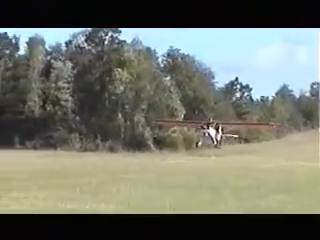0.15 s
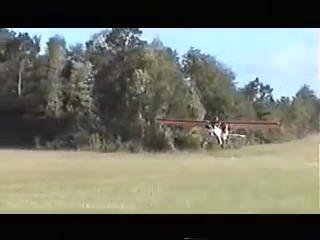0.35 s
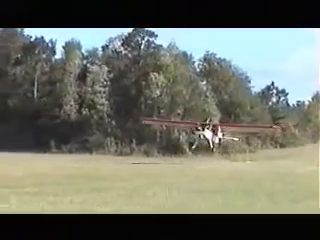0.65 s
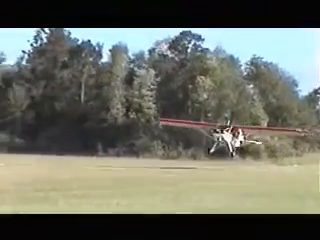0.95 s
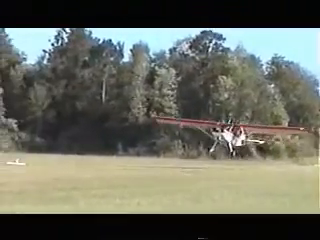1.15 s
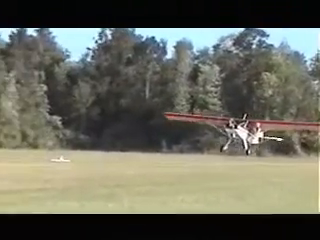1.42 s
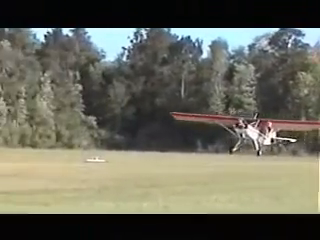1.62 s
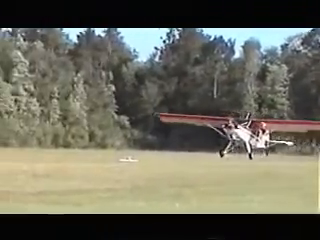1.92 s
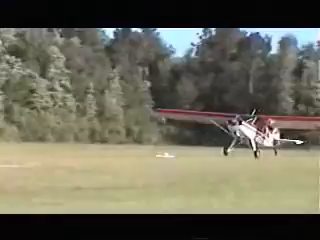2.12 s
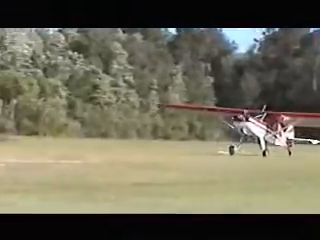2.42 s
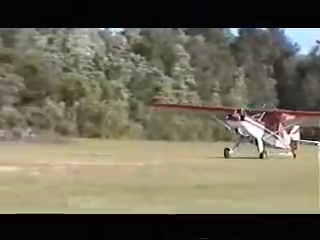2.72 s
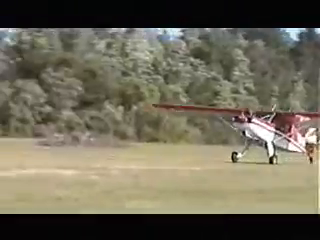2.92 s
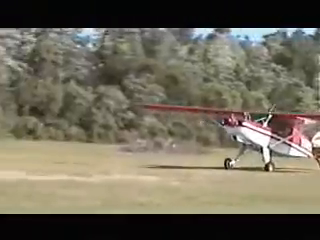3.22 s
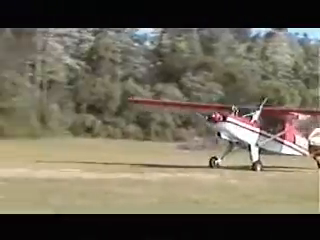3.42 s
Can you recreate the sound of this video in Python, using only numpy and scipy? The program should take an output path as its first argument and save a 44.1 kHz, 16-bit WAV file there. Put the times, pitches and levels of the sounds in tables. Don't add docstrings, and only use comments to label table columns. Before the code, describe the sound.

A small propeller plane rolls closer on grass, engine puttering, blades whistling and air roaring louder.

```python
import sys
import numpy as np
from scipy import signal
from scipy.fft import rfft, irfft
from scipy.io import wavfile

SR = 44100
rng = np.random.default_rng(int(sys.argv[2]) if len(sys.argv) > 2 else 0)


def boost_factor(decibels):
    exponent = np.asarray(decibels, float) / 20
    return 10 ** exponent


def master(y):
    cut = np.clip(np.atleast_2d(y).T, -1, 1)
    pcm = np.round(cut * 32767)
    wavfile.write(sys.argv[1], SR, pcm.astype(np.int16))


N = 156555
T = np.arange(N) / SR


def evened(x):
    return x / np.sqrt(np.mean(abs(x) ** 2) + 1e-20)


def curve(table, column):
    return np.interp(T, [row[0] for row in table], [row[column] for row in table])


def colour(points, dips=()):
    hz = np.fft.rfftfreq(N, 1 / SR)
    point_hz, point_db = np.transpose(points)
    shape_db = np.interp(np.log(hz + 1), np.log(point_hz + 1), point_db, -90, -90)
    for centre_hz, width_hz, depth_db in dips:
        shape_db = shape_db + depth_db * np.exp(-.5 * ((hz - centre_hz) / width_hz) ** 2)
    return evened(irfft(rfft(rng.standard_normal(N)) * boost_factor(shape_db), N))


def wander(width_hz):
    r = np.exp(-np.pi * width_hz / SR)
    z = rng.standard_normal(N) + 1j * rng.standard_normal(N)
    return evened(signal.lfilter([1], [1, -2 * r, r * r], z))


# time_s, shaft_turns
SHAFT_TURNS = [(-.04, -1), (.022, 0), (.2075, 3), (.5787, 9), (.8915, 14), (1.144, 18), (1.3973, 22),
               (1.5021, 24), (1.8847, 30), (2.203, 35), (2.461, 39), (2.72, 43), (2.9857, 47), (3.253, 51),
               (3.4515, 54), (3.586, 56)]


def shaft():
    lost_at_s, lost_s = 1.4705, 1024 / 44100
    time_s, turns = np.transpose(SHAFT_TURNS)
    real_time_s = time_s + lost_s * (time_s > lost_at_s)
    return np.interp(T + lost_s * (T > lost_at_s), real_time_s, turns)


# time_s, nearness_db, blade_loading_db
APPROACH = [(0.0, -65, -64.5), (1.06, -59, -52), (1.7, -52.5, -40), (1.85, -50, -37), (2.43, -47, -38.5),
            (2.46, -48, -40.5), (2.88, -47, -37.5), (3.0, -44, -39), (3.03, -44, -35), (3.04, -43, -38),
            (3.08, -45, -39), (3.55, -41.5, -36)]
# time_s, tip_speed_toward_listener_mach, whistle_pitch_factor
TURNING = [
    (0, .12, 1.02),
    (1.3, .14, 1.01),
    (2.1, .155, 1),
    (2.8, .2, .99),
    (3.4, .235, 1),
]
# place_turns, nose_on_db, side_on_db
CYLINDERS = [
    (0.419, -1.5, -1),
    (0.829, .5, -3),
    (1.331, -3, -6.5),
    (1.838, -6.5, -8.5),
]
# pitch_hz, width_hz, level_db
EXHAUST = [(64.9, 9.5, -1.5), (105.2, 17.5, 6), (125.5, 13.8, -2.5), (169, 22, -10), (203, 17.3, -8.5),
           (318, 87, -29.5)]
# pitch_hz, level_db_per_hz
RUMBLE = [(12, -39), (20, -37), (58, -2.5), (107, 10), (214, -7.5), (278, -26), (342, -13), (450, -43),
          (580, -63), (990, -120)]


def engine(turns):
    spread_db, jitter_s = 1.6, .0007
    side_on = np.clip((curve(TURNING, 1) - .135) / .01, 0, 1)
    kicks = np.zeros(N)
    for place, nose_db, side_db in CYLINDERS:
        at = np.flatnonzero(np.diff(np.floor((turns - place) / 2)))
        luck = rng.standard_normal((len(at), 2))
        level_db = nose_db + (side_db - nose_db) * side_on[at] + spread_db * luck[:, 0]
        late = np.round(jitter_s * SR * luck[:, 1]).astype(int)
        kicks[np.clip(at + late, 0, N - 1)] += boost_factor(level_db)

    t = T[:SR // 4]
    ring = np.zeros(len(t))
    for hz, width_hz, db in EXHAUST:
        ring += boost_factor(db) * np.exp(-np.pi * width_hz * t) * np.sin(2 * np.pi * hz * t)
    low_cut = signal.butter(4, 50, "high", fs=SR, output="sos")
    thump = signal.sosfilt(low_cut, signal.oaconvolve(kicks, ring)[:N])

    both = boost_factor(-43) * evened(thump) + boost_factor(-47.5) * colour(RUMBLE)
    near_db = curve(APPROACH, 1)
    return boost_factor(.55 * (near_db - near_db.mean())) * both


# blade_place_turns, rest_pitch_hz, level_db, beam_aim_turns, blur_hz
WHISTLES = [(0, 7387, 1.5, 0.24, 122), (0, 8290, -5, 0.04, 300), (0, 6340, -17, 0.14, 298),
            (0, 3742, -10, 0.28, 151), (0, 11370, -12, 0.53, 200), (.5, 10110, -1, 0.27, 154),
            (.5, 9380, -8, 0.11, 250), (.5, 6640, -2.5, 0.16, 150), (.5, 5546, -7.5, 0.19, 400)]
# time_s, depth_db
BEAM = [
    (0, 28),
    (1.3, 35),
    (2.3, 21),
    (2.9, 18),
    (3.3, 13),
    (3.55, 9.5),
]
# pitch_hz, level_db
SHEEN = [(3000, -2.5), (6000, -5), (7300, .5), (8500, -1.5), (9200, 3.5), (10200, 3.5), (11400, -5.5),
         (12300, -18)]
# pitch_hz, level_db_per_hz
SWISH = [(1760, -24), (3000, -9), (4240, -3.5), (4810, -6.5), (7170, 1.5), (10300, -3), (11400, -4),
         (11800, -8), (12500, -68), (16200, -102), (22000, -120)]


def propeller(turns):
    purity = .72
    flicker_db, flicker_hz = 2.2, 110
    mach, pitch_factor = curve(TURNING, 1), curve(TURNING, 2)
    beam_depth_db = curve(BEAM, 1)
    sheen_hz, sheen_db = np.transpose(SHEEN)
    tones = np.zeros(N)
    for place, rest_hz, level_db, aim, blur_hz in WHISTLES:
        angle = 2 * np.pi * (turns - place)
        heard_hz = np.minimum(rest_hz * pitch_factor / (1 + mach * np.cos(angle)), SR / 2)
        beam_db = -beam_depth_db * (1 - np.cos(angle - 2 * np.pi * aim)) / 2
        tint_db = np.interp(heard_hz, sheen_hz, sheen_db)
        flicker = flicker_db * wander(flicker_hz).real
        blurred = purity + (1 - purity) * wander(blur_hz)
        shape = blurred * boost_factor(level_db + beam_db + tint_db + flicker)
        tones += (shape * np.exp(2j * np.pi * np.cumsum(heard_hz) / SR)).real

    swish_db = -.5 + 2.2 * np.cos(4 * np.pi * (turns - .2))
    swish = colour(SWISH) * boost_factor(swish_db)
    return boost_factor(curve(APPROACH, 2)) * (boost_factor(10.5) * tones + swish)


# pitch_hz, level_db_per_hz
ROAR = [(150, 9), (250, -4), (564, -8), (1060, -7), (1300, -11), (1680, -5.5), (2720, -8.5), (3880, -11),
        (5200, -8), (6760, -17), (11400, -120)]
# pitch_hz, width_hz, depth_db
GROUND_DIPS = [(500, 132, -5), (1290, 56, -1.5), (2730, 75, -3), (4860, 200, -11.5)]


def slipstream(turns):
    gusts_db = .5 * wander(45).real
    beat_db = 1.2 * np.cos(4 * np.pi * (turns - .3))
    return colour(ROAR, GROUND_DIPS) * boost_factor(6 + curve(APPROACH, 1) + gusts_db + beat_db)


# pitch_hz, level_db_per_hz
FIELD = [(120, -31), (200, -10), (342, -7), (1860, -12), (2030, -12), (4910, -26.5), (7690, -10.5),
         (11700, -17), (12500, -24), (16200, -71), (22000, -120)]


def field():
    return boost_factor(-56) * colour(FIELD)


def whine():
    pitch_hz = 1925 + 15 * wander(7).real
    return boost_factor(-78) * np.sin(2 * np.pi * np.cumsum(pitch_hz) / SR)


# middle_s, level_db
TRILL = [(.83, -65), (.872, -69), (.916, -67), (.958, -74), (1.003, -67), (1.05, -63), (1.187, -69)]


def cricket():
    note_s, middle_hz, rise_hz = .034, 2406, 224
    out = np.zeros(N)
    for middle_s, level_db in TRILL:
        u = np.clip((T - middle_s) / note_s, -.5, .5)
        phase = 2 * np.pi * note_s * u * (middle_hz + rise_hz * u / 2)
        out += boost_factor(level_db + 10.5) * np.cos(np.pi * u) * np.sin(phase)
    return out


def scene():
    turns = shaft()
    left = engine(turns) + propeller(turns) + slipstream(turns) + field() + cricket()
    return np.array([left, whine()])


def band_limit(x):
    return signal.sosfilt(signal.butter(12, 12640, fs=SR, output="sos"), x)


def record(dry):
    treble_cut = signal.butter(8, 11500, fs=SR, output="sos")
    taped = signal.sosfilt(treble_cut, dry) + [[.0011], [-.0016]]
    return band_limit(taped)


dry = scene()
out = record(dry)
master(out)
```